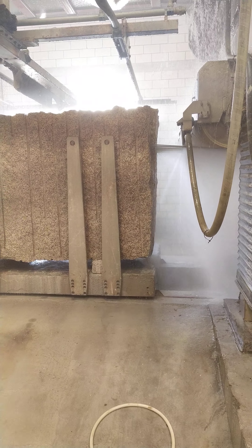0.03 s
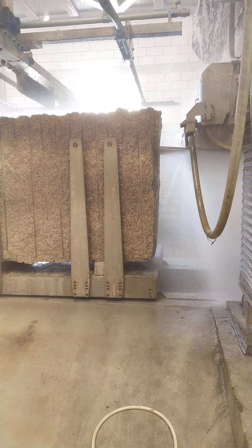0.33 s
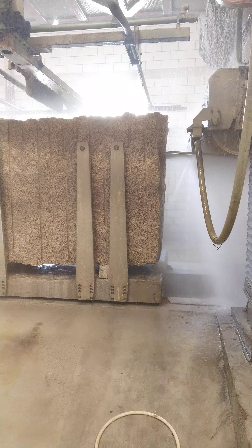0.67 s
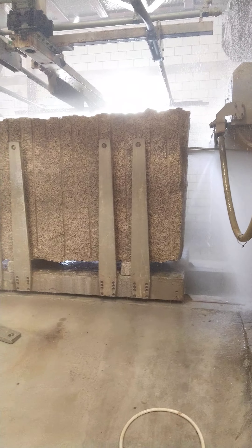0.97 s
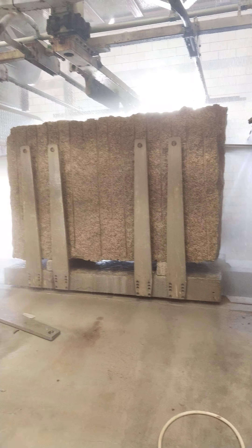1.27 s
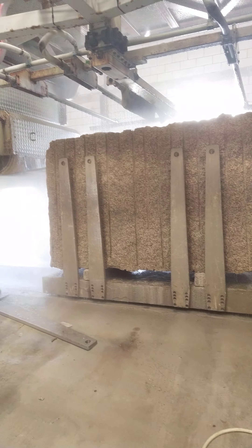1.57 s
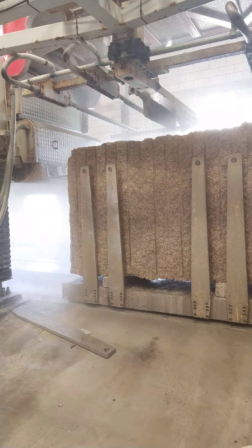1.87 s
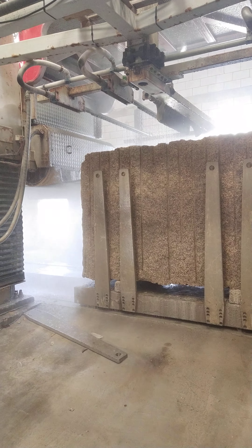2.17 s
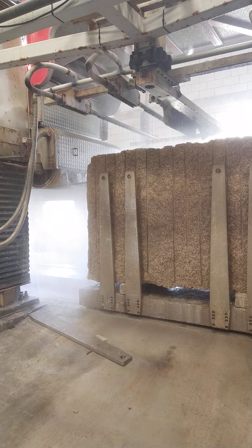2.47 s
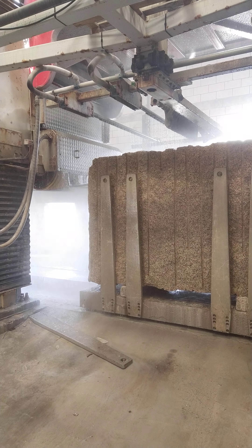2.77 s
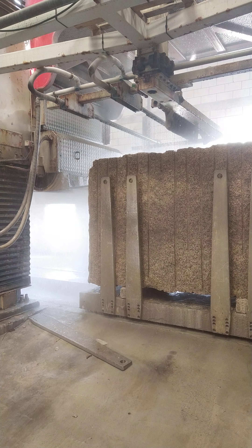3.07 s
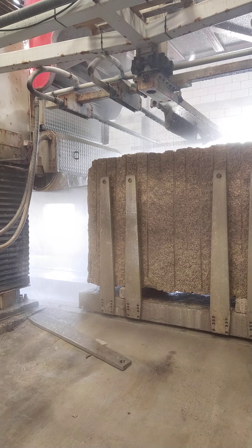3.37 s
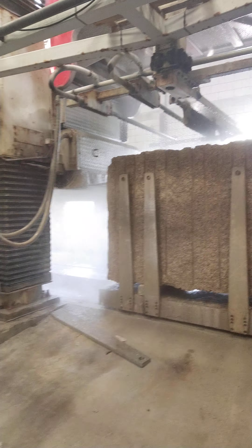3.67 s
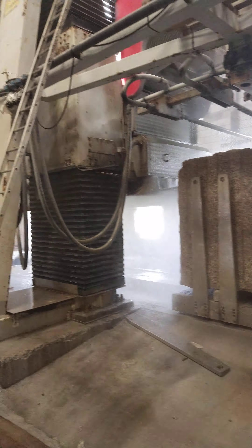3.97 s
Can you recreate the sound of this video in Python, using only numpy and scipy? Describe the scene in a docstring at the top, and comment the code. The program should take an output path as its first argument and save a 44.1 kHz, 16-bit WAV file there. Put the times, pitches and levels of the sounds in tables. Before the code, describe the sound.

Wire saw cutting stone, a steady roar with wavering whine and hissing water in a hall.

```python
"""A multi-wire saw cuts a granite block in a wet, echoing hall. Friction drives its beaded wires into
rough, wavering resonances near 1 kHz, and their grinding in the slots makes a broadband roar.
Pulleys whine, the drive hums and shakes the frame, and cooling water hisses and splashes over a low din.
The microphone turns away from the spray and toward the cutting frame on its left."""
import sys
import numpy as np
from scipy import signal
from scipy.fft import rfft, irfft, next_fast_len
from scipy.io import wavfile
from scipy.ndimage import uniform_filter1d, map_coordinates

SR = 44100
rng = np.random.default_rng(int(sys.argv[2]) if len(sys.argv) > 2 else 0)


def to_wav(s):
    """Save 16-bit WAV."""
    ch = np.atleast_2d(s).T  # columns
    pcm = np.round(np.clip(ch, -1, 1) * 32767)  # PCM
    wavfile.write(sys.argv[1], SR, pcm.astype(np.int16))


N = 176400

# Levels are relative; pan is left level minus right level.
# Likeness of the two ears in the hall: f/Hz, coherence
COHERENCE = [(60, 0.63), (120, 1), (200, 0.91), (380, 0.72), (700, 0.64), (1250, 0), (2400, 0.015),
             (15000, 0.11)]
# Spectra of the hall's din and of water on the floor: f/Hz, level/dB
HALL_SPECTRUM = [(40, -48), (120, -15), (200, 11.5), (320, 12.5), (460, -8), (700, -28), (1500, -50),
                 (4000, -58)]
SPLASH_SPECTRUM = [(1500, -25), (2600, -8), (3200, 11), (4000, 4), (5000, 9), (5800, -5), (8000, -47)]
# Envelopes of the splashing and of a narrow band of the hiss: t/s, level/dB
SPLASH_LEVEL = [(0, -40.5), (.7, -42), (1.05, -31.5), (1.4, -30.5), (1.6, -35), (1.8, -38.5), (2.0, -71),
                (3.1, -67), (3.24, -33), (3.36, -61), (4, -46)]
SIZZLE_LEVEL = [(0, -57), (.9, -38), (1.3, -40), (1.7, -43), (2.2, -48), (2.7, -53), (2.95, -30),
                (3.12, -47), (3.27, -32.5), (3.5, -40.5), (3.75, -30.5), (4, -37)]
# Turn of the microphone: t/s, share of spray power heard from aside (0-1)
TURN = [(0, 0), (1.0, 0), (1.42, 0.53), (1.6, 0.87), (1.85, 1), (4, 0.98)]
# Cooling spray: t/s, level/dB, pan/dB
SPRAY_LEVEL_PAN = [(0, -23.5, 0), (.56, -24.5, -0.5), (.92, -24.5, 1), (1.39, -23, -3.5),
                   (1.57, -26.5, -5.5), (1.73, -25, -5.5), (1.86, -30, -7.5), (2.0, -25.5, -7.5),
                   (2.08, -29, -6), (2.23, -25.5, -8), (2.72, -27.5, -6.5), (2.96, -25.5, -9),
                   (3.14, -31.5, -7.5), (3.25, -24.5, -8.5), (3.48, -32, -6.5), (3.65, -29, -9.5),
                   (3.82, -31, -11.5), (4, -30, -8.5)]
# Spray spectra, head-on and from aside: f/Hz, level/dB
SPRAY_FACING = [(1000, -18), (2600, -6), (3300, -4), (3900, -1.5), (5000, 2), (6400, 5.5), (8200, 1),
                (9300, 2), (10100, 2), (12500, 6), (14000, 3), (15100, -0.5), (15600, -15)]
SPRAY_ASIDE = [(1000, -22.5), (3200, 0), (4800, -2), (5750, -6), (6400, 0), (7500, -0.5), (8400, -2),
               (9900, 4), (11300, 1), (13000, -4.5), (14100, -3.5), (15500, -8)]
# Shading of the spray between the ears, head-on and from aside: f/Hz, pan/dB
EARS_FACING = [(3000, -0.5), (5000, 3.5), (6100, 4.5), (7600, -4.5), (9200, -1.5), (10700, 1.5),
               (13000, 5.5), (15000, 2)]
EARS_ASIDE = [(3000, 7.5), (5600, 6.5), (6600, 3.5), (7600, -3.5), (9000, 3.5), (10300, 8.5), (11300, 6),
              (13000, 10), (15000, 0.5)]
# Envelopes of the drive and the pulleys: t/s, level/dB
DRIVE_LEVEL = [(0, -41.5), (.35, -49), (.6, -44.5), (1.15, -50), (1.42, -41), (1.58, -52.5), (1.76, -37.5),
               (2.15, -40), (2.32, -45), (2.6, -34), (3.05, -40.5), (3.38, -33.5), (3.62, -41.5), (4, -36)]
PULLEY_LEVEL = [(0, -53), (.6, -52), (.74, -40), (.85, -49), (1.6, -47), (1.88, -32), (2.2, -35),
                (2.6, -33), (2.94, -29.5), (3.05, -35), (3.25, -34.5), (3.5, -36.5), (3.69, -31.5),
                (3.85, -43), (4, -42)]
# Rumble spectrum of the frame, and hum tones of the motor: f/Hz, level/dB
FRAME_SPECTRUM = [(20, -44), (42, -44), (60, -33), (80, -10), (105, -4.5), (130, 1.5), (155, 3),
                  (195, -4.5), (300, -13.5), (600, -36.5)]
HUM_TONES = [(59.2, -21.5), (134.6, -10)]
# Grinding in the slots: t/s, level/dB, pan/dB
ROAR_LEVEL_PAN = [(0, -36, 1), (.45, -39, 1), (.68, -37.5, -1.5), (.83, -39, 3), (1.1, -35, 2),
                  (1.5, -34, 2), (1.8, -29.5, 6), (2.04, -27, 7), (2.15, -29, 7.5), (2.26, -25.5, 5),
                  (2.38, -30.5, 6.5), (2.55, -28, 6), (2.8, -30.5, 6), (2.94, -28, 6.5), (3.1, -32.5, 6),
                  (3.35, -29.5, 6), (3.55, -28, 8), (3.72, -29.5, 3), (4, -31, 7)]
# Low body of the roar: t/s, level/dB
BOOM_LEVEL = [(0, -60), (1.85, -53), (2.0, -28.5), (2.3, -39.5), (2.55, -31), (2.75, -56), (2.9, -31),
              (3.1, -47), (4, -58)]
# Spectra of the roar, its low body and the tighter wire's scraping: f/Hz, level/dB
ROAR_SPECTRUM = [(60, -34), (150, -18), (250, -5), (380, -2), (520, -2.5), (660, 1), (770, -1), (900, 5),
                 (1180, 3.5), (1450, -6), (1700, -4), (2000, -5.5), (2400, -9), (3400, -14.5),
                 (6000, -39.5), (12000, -44)]
BOOM_SPECTRUM = [(220, -17), (340, 16), (430, 14), (520, 1), (640, -21)]
RASP_SPECTRUM = [(700, -40), (1150, 6), (1300, 0), (1500, -16.5), (1900, 11), (2500, -16), (3300, -19),
                 (5000, -55)]
# Resonances of the pulleys, main wire, tighter wire and upper tones of all wires: f/Hz
PULLEY_HZ = [640.6, 667]
MAIN_HZ = [1017.5, 1055]
TIGHT_HZ = [1129.5]
UPPER_HZ = [2035, 2123, 2257, 3182]
# One row per resonance above: core level/dB, skirt level/dB, skirt half-width/Hz, pan/dB
PULLEY_MODES = [(-1.7, -6.5, 18, 0), (-14, -16, 30, -3)]
MAIN_MODES = [(-2, -7.5, 45, 0.5), (-15.5, -11.5, 25, -4)]
TIGHT_MODES = [(-5.5, -4, 110, 6)]
UPPER_MODES = [(-9, -1.5, 85, 3), (-7, -4.5, 35, 0), (-14, -10, 25, -1), (-18, -13, 30, -3)]
# Singing of the main wire: t/s, level/dB, pan/dB
MAIN_LEVEL_PAN = [(0, -32, -4), (.06, -27.5, -7), (.2, -29, -5), (.32, -32.5, -1), (.46, -31.5, 0),
                  (.6, -39, -2), (.7, -28, -2), (.82, -41, 0), (.9, -31, 0), (.98, -27, 1), (1.12, -26, 0),
                  (1.24, -24, -5), (1.34, -31, 0), (1.42, -27, 7), (1.55, -34, 3), (1.7, -26, 5),
                  (1.82, -22, 6), (1.97, -24, 6), (2.06, -21.5, 7), (2.2, -37, 5), (2.29, -23.5, 6),
                  (2.37, -30, 5), (2.47, -24, 6), (2.55, -25, 5), (2.65, -22.5, 5), (2.8, -25, 6),
                  (2.92, -35, 1), (3.0, -27, 5), (3.12, -30, 5), (3.2, -23.5, 10), (3.27, -22.5, 8),
                  (3.37, -24.5, 7), (3.45, -38, 3), (3.52, -25, 8), (3.7, -25.5, 5), (3.8, -36, 3),
                  (3.86, -33, 4), (3.91, -22, 9), (3.96, -33, 5), (4, -25, 9)]
# Envelopes of the tighter wire and the upper tones: t/s, level/dB
TIGHT_LEVEL = [(0, -32), (.2, -49), (.42, -37), (.6, -55), (.85, -49), (1.05, -34.5), (1.45, -34),
               (1.6, -34.5), (1.8, -21), (1.95, -29), (2.08, -22), (2.2, -29.5), (2.5, -29), (2.66, -30),
               (2.95, -39), (3.2, -49), (3.4, -31), (3.52, -20), (3.68, -36), (3.8, -32), (4, -30)]
UPPER_LEVEL = [(0, -42), (.3, -48), (.55, -43), (.8, -50), (1.05, -44), (1.43, -37), (1.6, -40),
               (2.1, -34.5), (2.45, -38), (2.7, -34), (2.93, -31), (3.1, -35.5), (3.55, -33), (3.75, -42),
               (4, -37)]
# Upper tones that ring out: t/s, width/s, f/Hz, peak level/dB
SQUEALS = [(.07, .13, 2035, -39), (.08, .1, 2257, -39), (.54, .17, 2257, -39), (.65, .1, 2035, -40),
           (.9, .09, 2257, -43), (1.05, .09, 2035, -39), (1.19, .07, 2257, -37), (1.37, .18, 2035, -33),
           (1.43, .12, 2123, -37), (1.55, .09, 2257, -39), (1.64, .1, 2035, -38), (2.53, .12, 2257, -37),
           (2.73, .17, 2035, -32), (2.97, .12, 2035, -33), (3.1, .14, 2123, -36), (3.58, .09, 2123, -35)]
# Beads that catch hard in the stone: t/s, boost/dB
CATCHES = [(2.055, 3), (2.642, 3), (2.725, 5), (3.567, 3), (3.685, 3), (3.72, 4.5)]

HALL_DB, TOP_HZ, EAR_LAG_RAD = -47.5, 15600, 1.5
SIZZLE_HZ, SIZZLE_WIDTH_HZ, SIZZLE_PAN_DB = 7470, 280, -13
SQUEAL_DB, SQUEAL_RASP_DB, SQUEAL_WIDTH_HZ = 1.7, -3, 35
LOW_FADE_DB, UPPER_FADE_DB, FADES_PER_S = 0.7, 5, 11
CHATTER_DB, CHATTER_PER_S, CATCH_S, RASP_DB = 1.5, 52, 0.034, -11
WIRE_SHIFT_DB = -1.5  # pan of the wires against the roar


def amp(db):
    """Amplitude ratio of a level in decibels."""
    return 10 ** (np.asarray(db) / 20)


def unit(x):
    """Normalisation to rms 1."""
    return x / np.sqrt(np.mean(np.abs(x) ** 2) + 1e-20)


def along(points, hz):
    """Interpolation of (f/Hz, value) points on a logarithmic frequency axis."""
    f, values = np.transpose(points)
    return np.interp(np.log(hz + 1), np.log(f + 1), values)


def spectrum(points):
    """Amplitude response through (f/Hz, level/dB) points."""
    return lambda hz: amp(along(points, hz))


def curves(rows):
    """Linear interpolation of each column after the time, one value per sample."""
    times, *columns = np.transpose(rows)
    return [np.interp(np.arange(N) / SR, times, column) for column in columns]


def wobble(rate):
    """Smooth random modulation with rate knots a second."""
    return map_coordinates(rng.standard_normal(2048), [np.arange(N) * rate / SR], mode="wrap")


def swell(centre_s, width_s):
    """Raised-cosine pulse of height 1, width_s wide at half height."""
    return np.cos(np.pi / 2 * np.clip((np.arange(N) / SR - centre_s) / width_s, -1, 1)) ** 2


def filtered(x, response):
    """Linear filtering: the spectrum of x is multiplied by a frequency response."""
    size = next_fast_len(N + SR // 4)
    return irfft(rfft(x, size) * response(np.fft.rfftfreq(size, 1 / SR)), size)[..., :N]


def panned(db):
    """Constant-power left and right gains for an interaural level difference."""
    gains = amp(np.array([db, -db]) / 2)
    return gains / np.sqrt(np.mean(gains ** 2, axis=0))


def diffuse(response, patchy_db=None, patch_bins=4, patch_frames=6):
    """Diffuse-field noise of rms 1: the ratio of mid to side sets the coherence between the ears."""
    pair = rng.standard_normal((2, N))
    if patchy_db is not None:  # random gain in patches of frequency and time
        cells = signal.stft(pair, nperseg=1024)[2]
        field = uniform_filter1d(rng.standard_normal(cells.shape[1:]), patch_bins, axis=0)
        field = uniform_filter1d(field, patch_frames, axis=1)
        patches = np.minimum(unit(field), 1.3)  # cap in standard deviations
        pair = signal.istft(cells * amp(patchy_db * patches), nperseg=1024)[1][:, :N]

    def mid_side(hz):
        angle = np.arccos(np.clip(along(COHERENCE, hz), -1, 1)) / 2
        return response(hz) * np.array([np.cos(angle), np.sin(angle)])

    mid, side = filtered(pair, mid_side)
    return unit(np.array([mid + side, mid - side]))


def tone(hz, drift_hz, lag=0):
    """Sinusoid of rms 1 with slight random frequency modulation and a phase lag in radians."""
    cycles = np.cumsum(hz + drift_hz * wobble(12)) / SR + rng.random()
    return np.sqrt(2) * np.sin(2 * np.pi * cycles - lag)


def ringing(hz):
    """Interaural phase difference: a nearly pure tone reaches the right ear after the left."""
    return tone(hz, drift_hz=2.5, lag=np.array([[0], [EAR_LAG_RAD]]))


def skirt(hz, width_hz):
    """Noise in one resonance, falling to half amplitude width_hz either side of the peak."""
    return diffuse(lambda f: 1 / (1 + ((f - hz) / width_hz) ** 2))


def singing(pitches, modes, pan_db, fade_db):
    """Friction-driven resonances: each is a tonal core, fading at random, in a skirt of noise."""
    sound = np.zeros((2, N))
    for hz, (core_db, skirt_db, width_hz, shift_db) in zip(pitches, modes):
        core = ringing(hz) * unit(amp(fade_db * wobble(FADES_PER_S)))
        mode = amp(core_db) * core + amp(skirt_db) * skirt(hz, width_hz)
        sound += mode * panned(pan_db + shift_db)
    return sound


def hall():
    """Reverberation blends distant machinery into a steady low din."""
    return amp(HALL_DB) * diffuse(spectrum(HALL_SPECTRUM))


def splash():
    """Impacts of run-off on the wet floor radiate uneven noise, loudest as the microphone swings past."""
    slaps = diffuse(spectrum(SPLASH_SPECTRUM), patchy_db=2.5)
    return amp(curves(SPLASH_LEVEL)[0]) * slaps * panned(3.3)[:, None]


def hiss(colour, ears):
    """Spray noise with narrow, lingering streaks; its interaural level difference depends on frequency."""
    noise = diffuse(spectrum(colour), patchy_db=4.2, patch_bins=2, patch_frames=14)
    return unit(filtered(noise, lambda hz: panned(along(ears, hz))))


def spray():
    """Directivity: the hiss is bright head-on and duller from aside, with a narrow sizzle on the right."""
    level_db, pan_db = curves(SPRAY_LEVEL_PAN)
    turn, = curves(TURN)
    facing = np.sqrt(1 - turn) * hiss(SPRAY_FACING, EARS_FACING)
    aside = np.sqrt(turn) * hiss(SPRAY_ASIDE, EARS_ASIDE)
    broadband = amp(level_db + 3.0) * (facing + aside) * panned(pan_db)
    sizzle = amp(curves(SIZZLE_LEVEL)[0]) * skirt(SIZZLE_HZ, SIZZLE_WIDTH_HZ)
    flutter = amp(0.35 * wobble(29.4))
    return (broadband + sizzle * panned(SIZZLE_PAN_DB)[:, None]) * flutter


def drive(pan_db):
    """Forced vibration: the humming motor shakes the steel frame into a rumble."""
    level_db, = curves(DRIVE_LEVEL)
    rumble = diffuse(spectrum(FRAME_SPECTRUM), patchy_db=-1.5)
    hum = sum(amp(db) * tone(hz, drift_hz=0.77) for hz, db in HUM_TONES)
    return amp(level_db + 0.5) * (rumble + hum) * panned(0.91 * pan_db)


def pulleys(pan_db):
    """Resonance: the pulleys whine in one strong mode with a weak neighbour just above it."""
    return amp(curves(PULLEY_LEVEL)[0]) * singing(PULLEY_HZ, PULLEY_MODES, pan_db, LOW_FADE_DB)


def grinding():
    """Abrasion in the slots radiates a broadband roar; its low body booms as the microphone faces it."""
    level_db, pan_db = curves(ROAR_LEVEL_PAN)
    roar = diffuse(spectrum(ROAR_SPECTRUM), patchy_db=2.6, patch_bins=2, patch_frames=8)
    flutter_db = 0.72 * wobble(40)
    boom = amp(curves(BOOM_LEVEL)[0]) * diffuse(spectrum(BOOM_SPECTRUM))
    return (amp(level_db + 4.5 + flutter_db) * roar + boom) * panned(pan_db)


def squeals(pan_db):
    """Frictional excitation: a wire grips briefly and an upper tone rings out with a raspy edge."""
    voices = {hz: unit(ringing(hz) + amp(SQUEAL_RASP_DB) * skirt(hz, SQUEAL_WIDTH_HZ))
              for hz in UPPER_HZ}
    rings = sum(amp(db) * swell(at_s, width_s) * voices[hz] for at_s, width_s, hz, db in SQUEALS)
    return amp(SQUEAL_DB) * rings * panned(pan_db + WIRE_SHIFT_DB)


def wires(pan_db):
    """Friction makes the wires sing and scrape; beads catching in the stone modulate the amplitude."""
    wire_pan_db = pan_db + WIRE_SHIFT_DB
    main_db, main_pan_db = curves(MAIN_LEVEL_PAN)
    tight_db, = curves(TIGHT_LEVEL)
    upper_db, = curves(UPPER_LEVEL)
    main = amp(main_db + 1.0) * singing(MAIN_HZ, MAIN_MODES, main_pan_db, LOW_FADE_DB)
    tight = amp(tight_db + 1.0) * singing(TIGHT_HZ, TIGHT_MODES, wire_pan_db, LOW_FADE_DB)
    upper = amp(upper_db) * singing(UPPER_HZ, UPPER_MODES, wire_pan_db, UPPER_FADE_DB)
    rasp = amp(tight_db + RASP_DB) * diffuse(spectrum(RASP_SPECTRUM)) * panned(pan_db)
    catch_db = sum(db * swell(at_s, CATCH_S) for at_s, db in CATCHES)
    chatter = unit(amp(CHATTER_DB * wobble(CHATTER_PER_S)))
    return (main + tight + upper + rasp) * amp(catch_db) * chatter


def scene():
    """Superposition of the saw, its cooling water and the hall."""
    _, pan_db = curves(ROAR_LEVEL_PAN)
    saw = wires(pan_db) + squeals(pan_db) + grinding() + pulleys(pan_db) + drive(pan_db)
    return saw + spray() + splash() + hall()


def record(dry):
    """Band limiting: an ideal low-pass filter removes everything above TOP_HZ."""
    return filtered(dry, lambda hz: hz < TOP_HZ)


dry = scene()
out = record(dry)
to_wav(out)
```